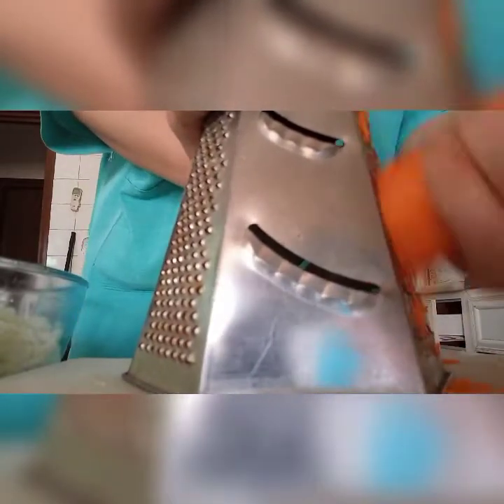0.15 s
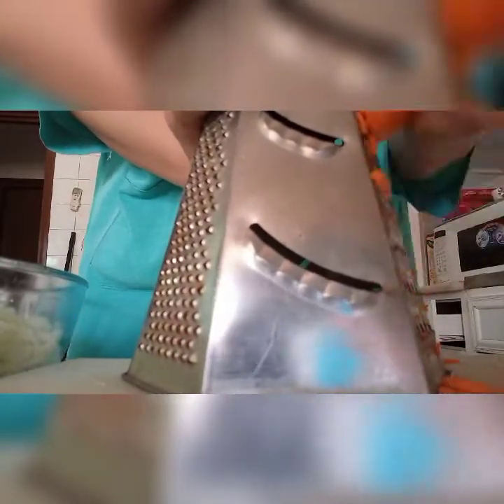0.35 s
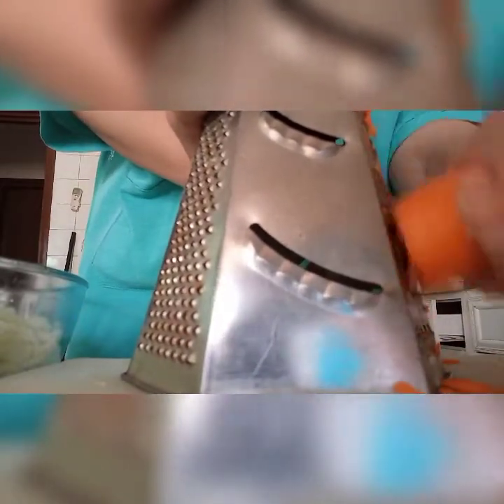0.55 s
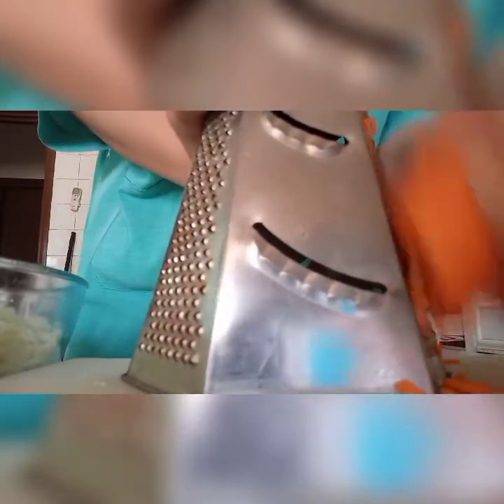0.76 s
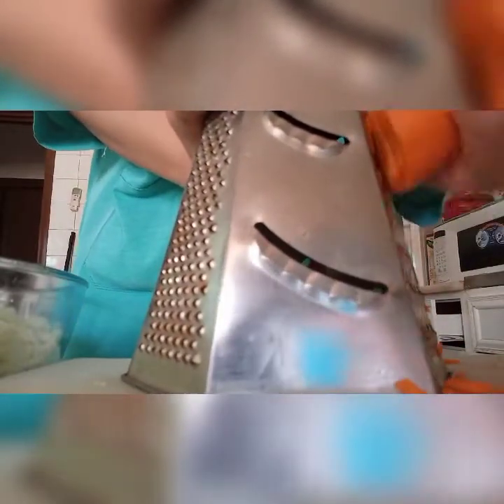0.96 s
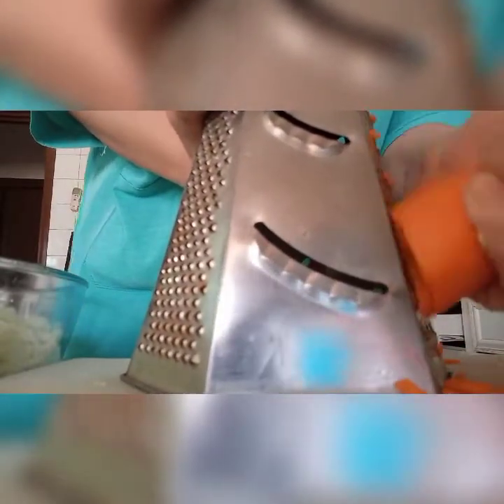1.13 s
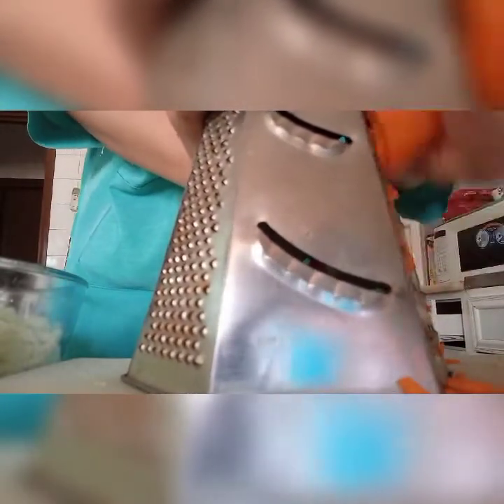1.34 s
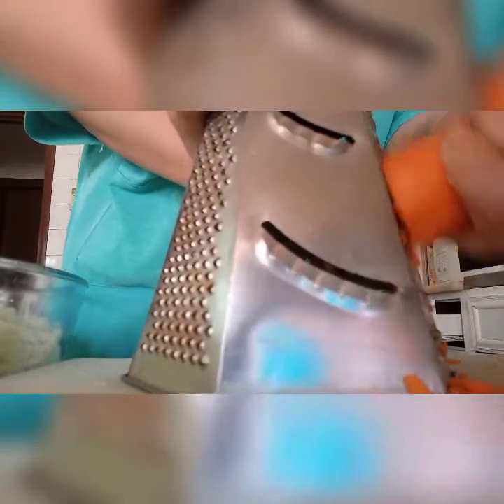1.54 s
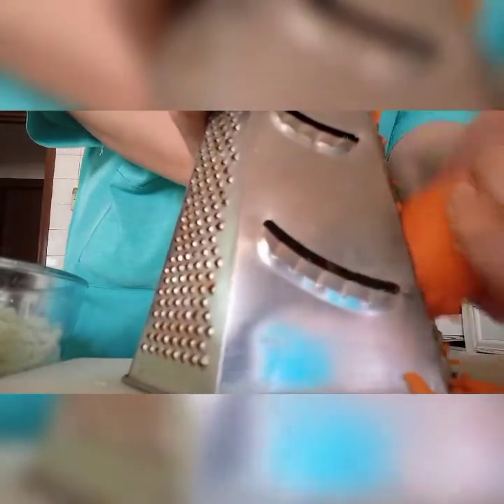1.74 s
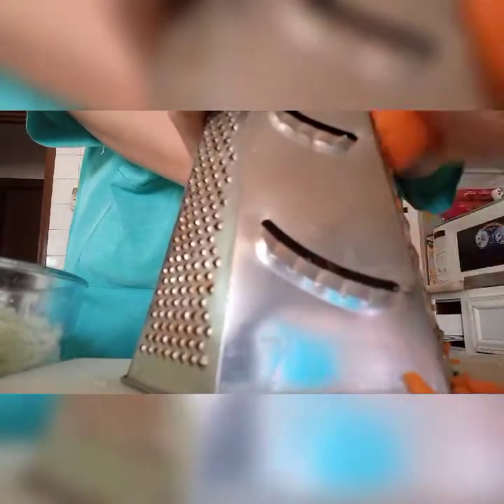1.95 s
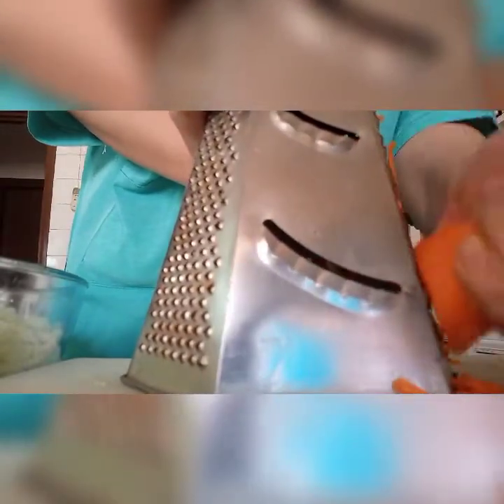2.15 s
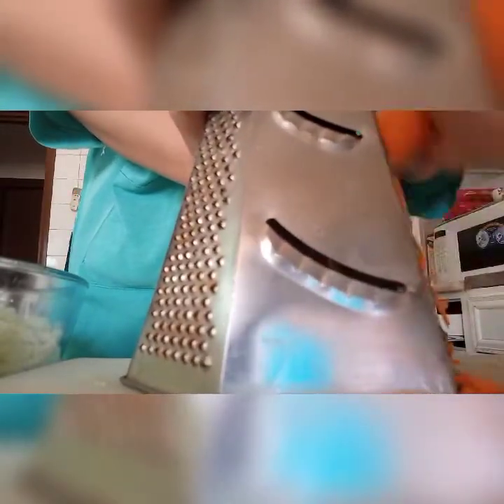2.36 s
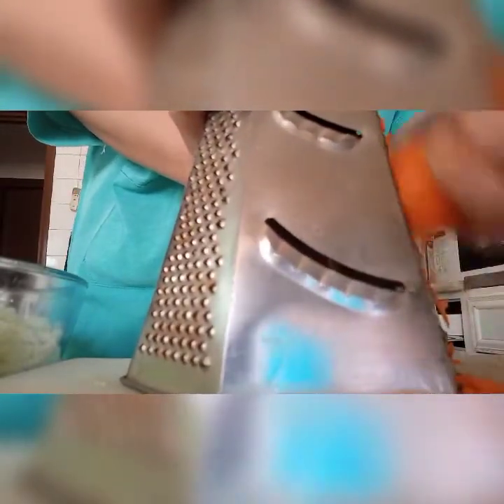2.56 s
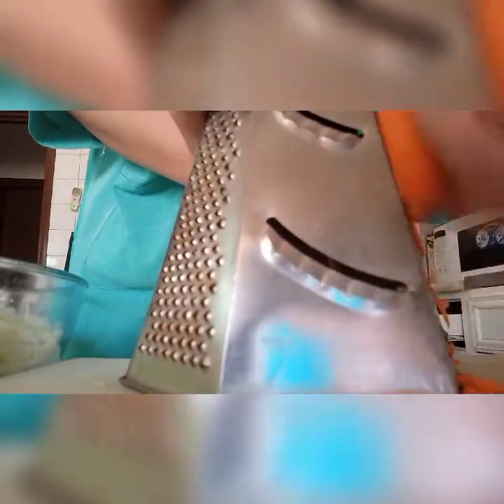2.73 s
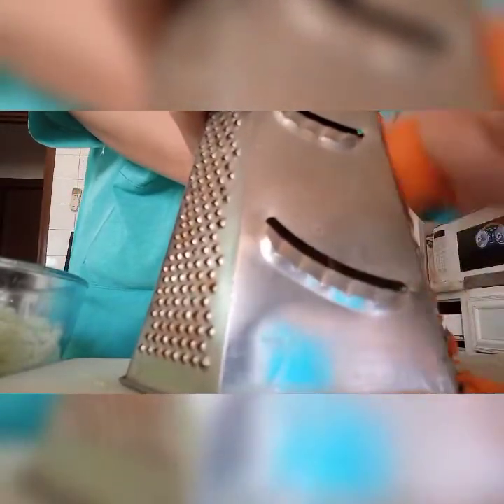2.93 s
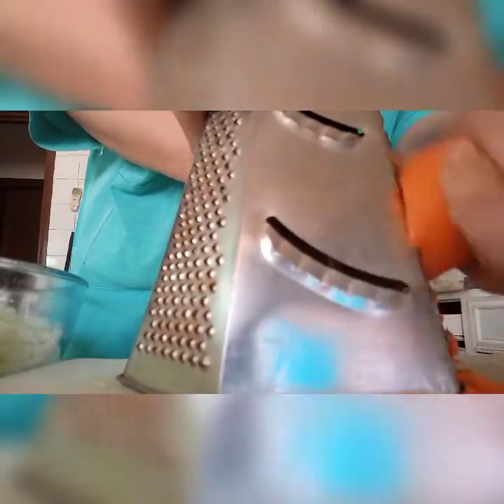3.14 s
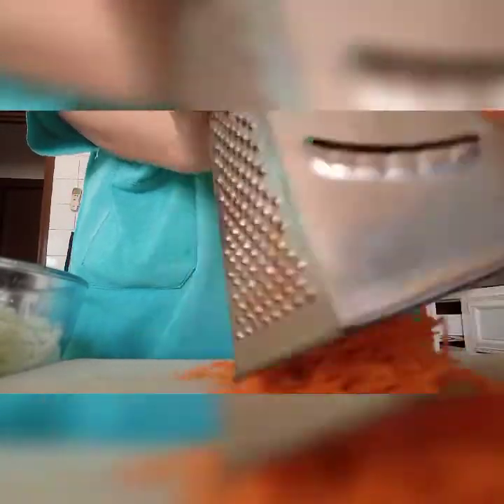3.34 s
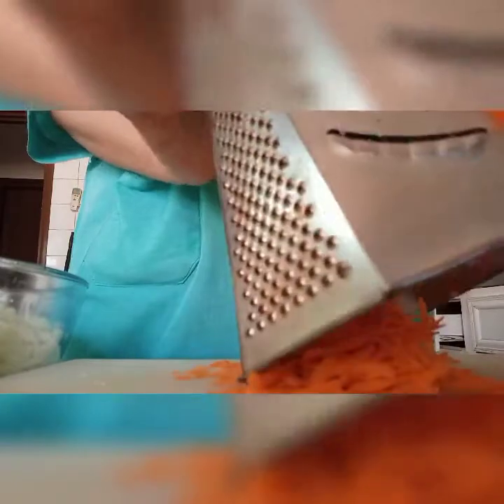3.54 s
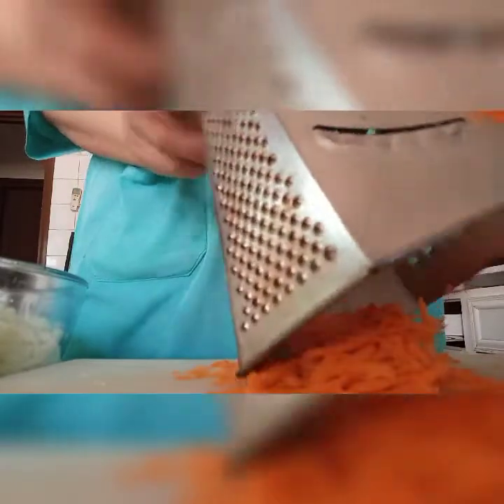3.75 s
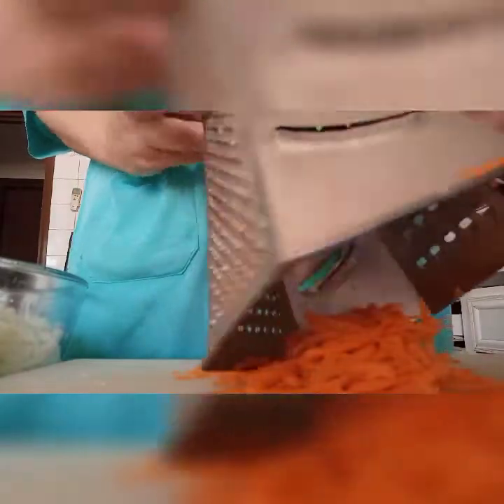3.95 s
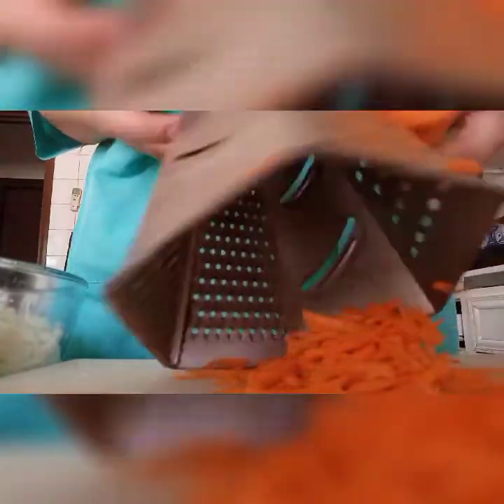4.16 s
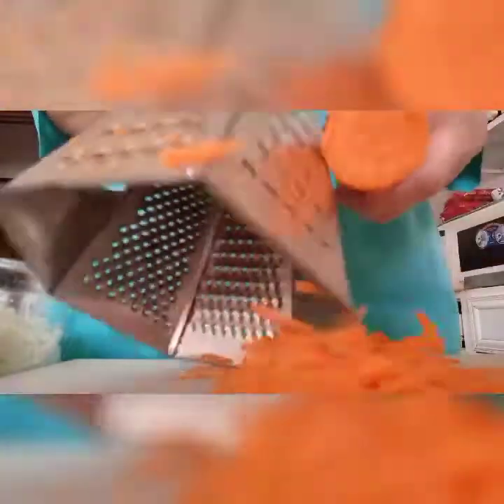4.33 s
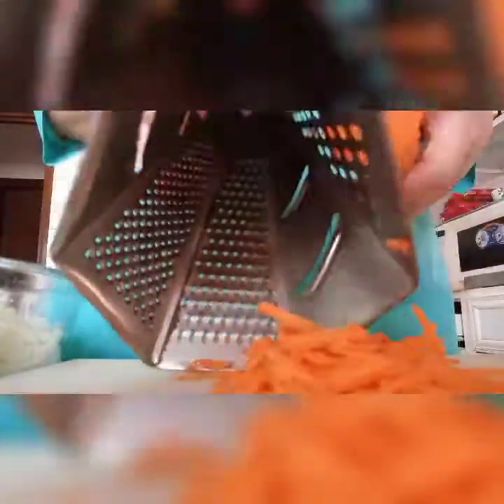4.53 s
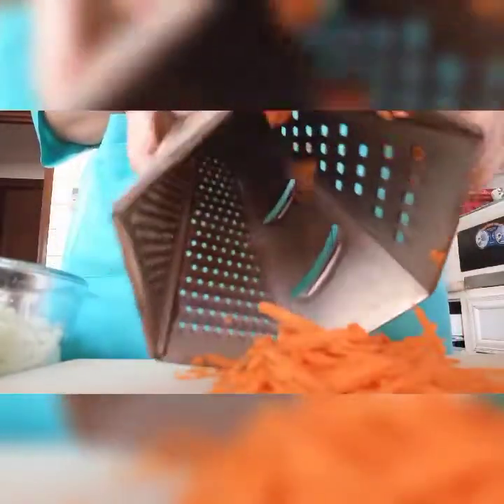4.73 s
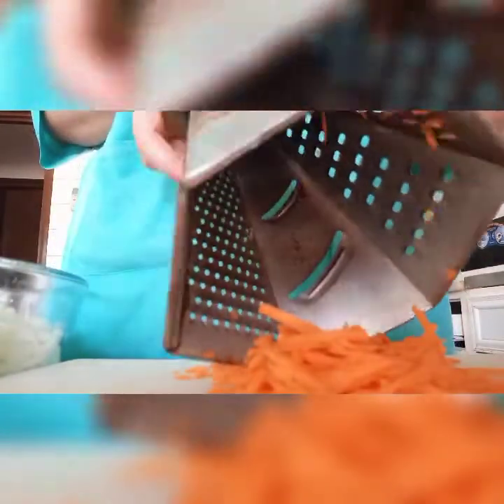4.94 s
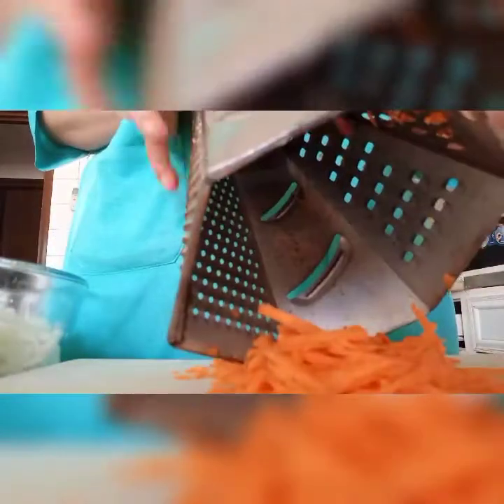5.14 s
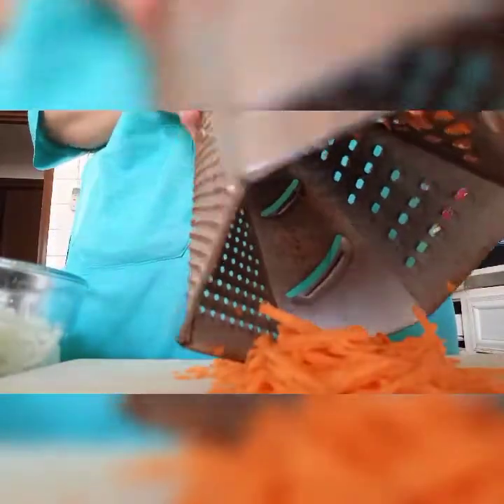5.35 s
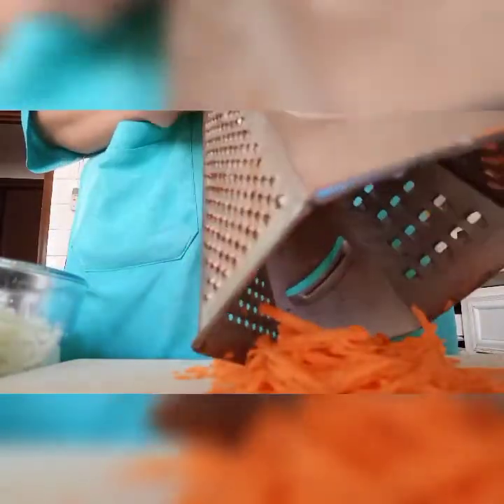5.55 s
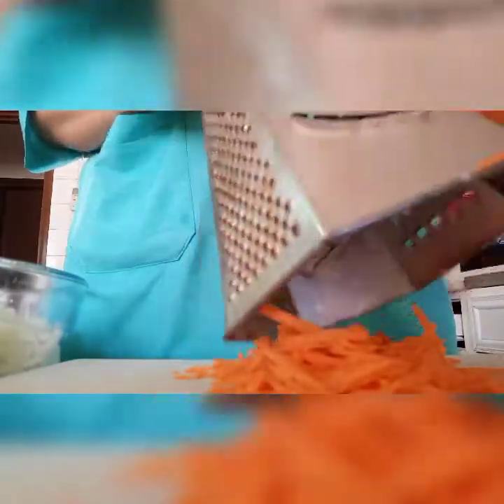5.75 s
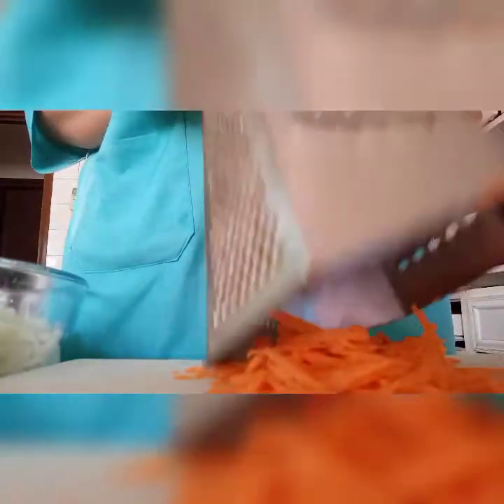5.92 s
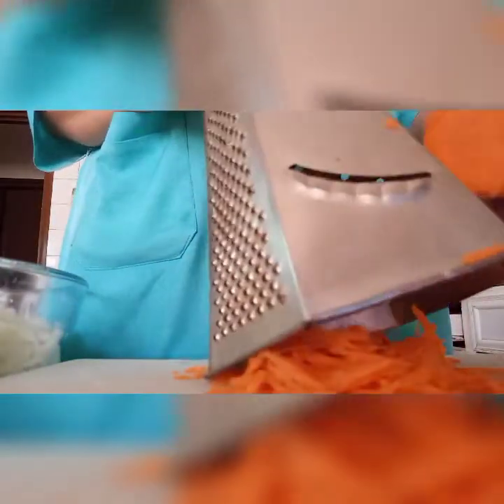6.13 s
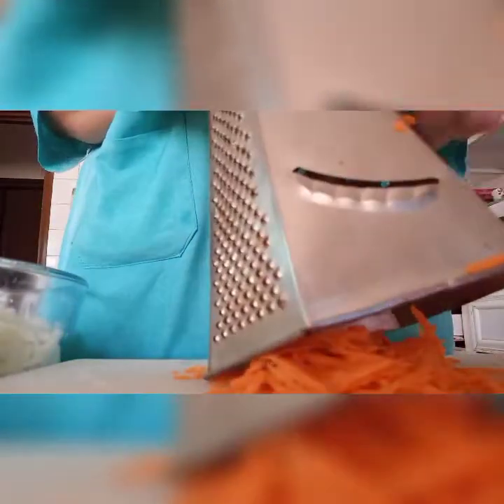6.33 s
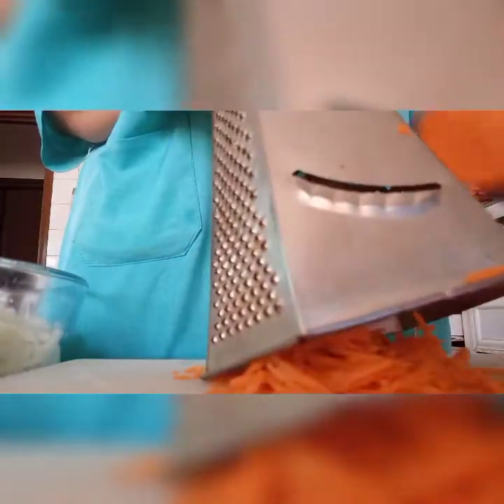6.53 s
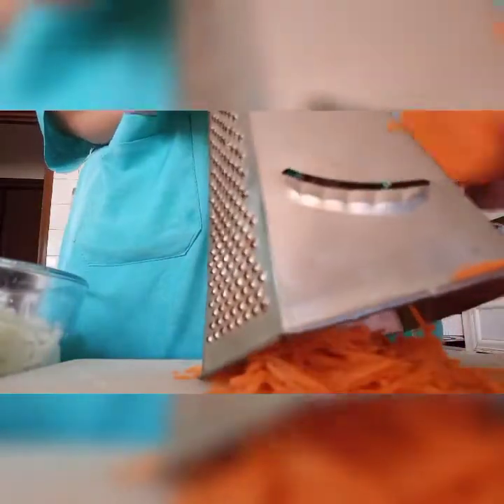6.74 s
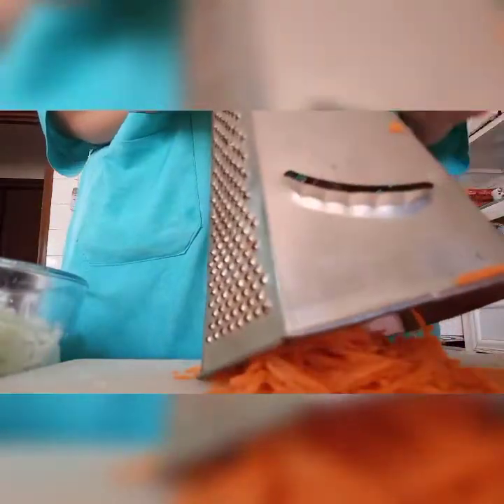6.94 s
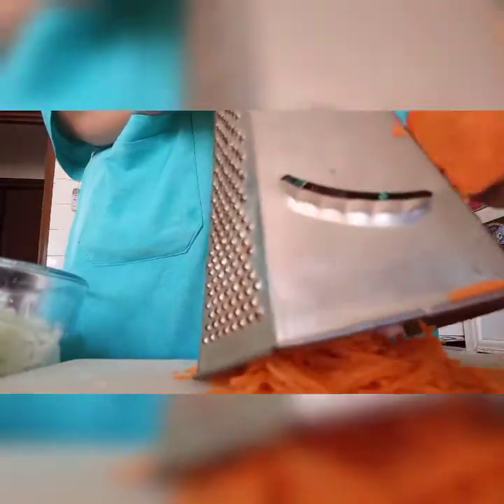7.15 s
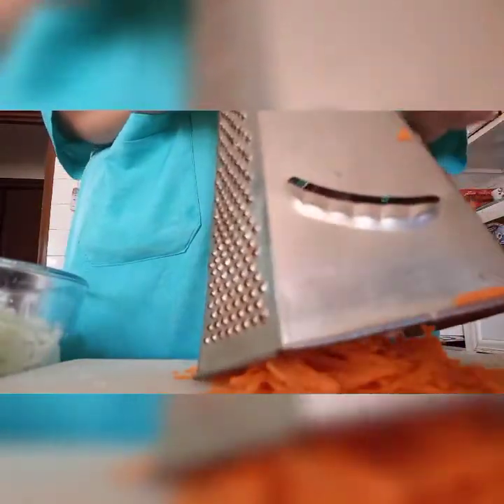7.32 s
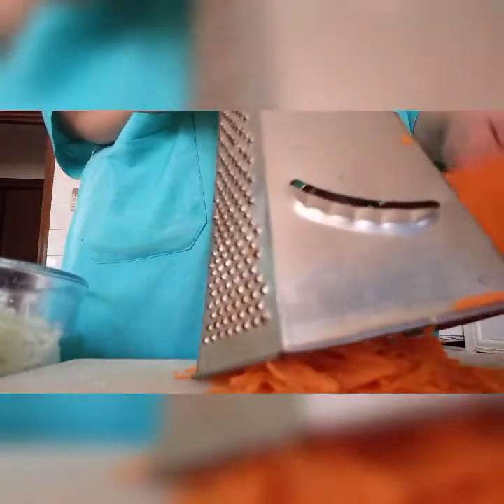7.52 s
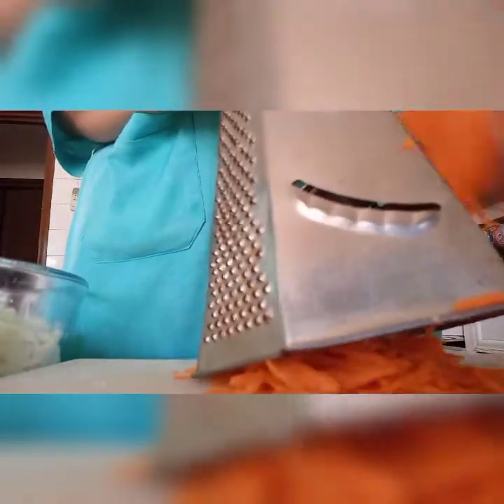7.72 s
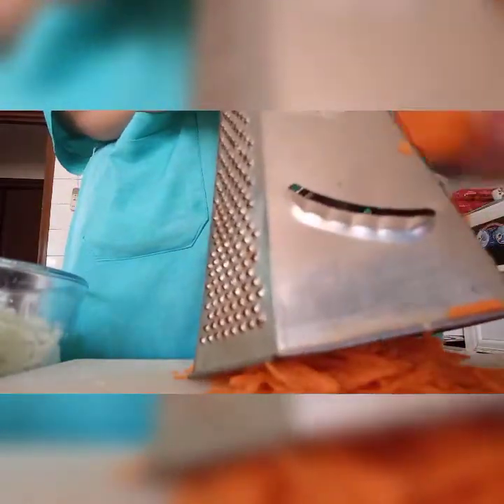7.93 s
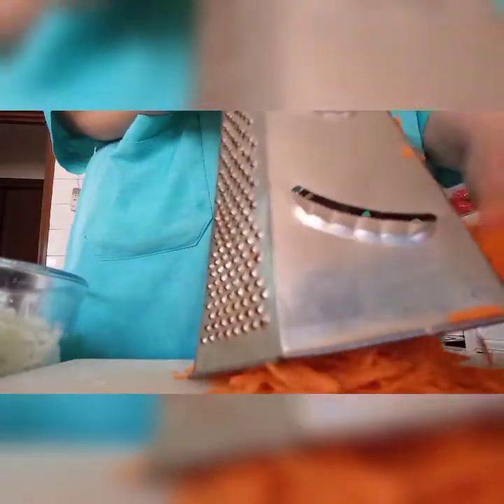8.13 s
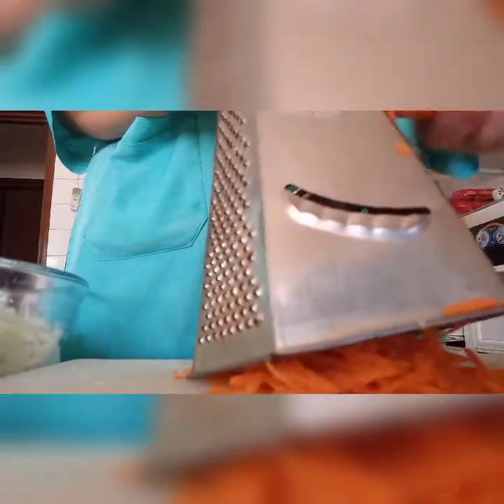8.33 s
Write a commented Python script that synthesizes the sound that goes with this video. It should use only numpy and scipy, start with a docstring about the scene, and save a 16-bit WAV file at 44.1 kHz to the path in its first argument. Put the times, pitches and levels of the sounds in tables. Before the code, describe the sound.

Quick back-and-forth grating of carrot on a ringing metal grater stops for some soft handling, then starts again in a quiet kitchen.

```python
"""In a quiet kitchen, a raw carrot is rasped up and down a sheet-metal box grater on a board.
Tearing fibres crackle, the grater walls ring briefly and the board hums low under each push.
In a pause the grater is tilted, handled and set down again, with small taps and scuffs.
Then the grating resumes. A short echo and faint room air lie behind it."""
import sys
import numpy as np
from scipy import signal
from scipy.fft import rfft, irfft
from scipy.io import wavfile
from scipy.ndimage import uniform_filter1d

SR = 44100
rng = np.random.default_rng(int(sys.argv[2]) if len(sys.argv) > 2 else 0)


def to_wav(sig):
    """Store sig (one row per channel, or 1-D mono) as 16-bit WAV at the path in sys.argv[1].

    Samples outside -1..1 are clipped; the rate is SR.
    """
    pcm = np.clip(np.atleast_2d(sig), -1, 1) * 32767
    pcm = np.round(pcm).astype(np.int16)
    wavfile.write(sys.argv[1], SR, pcm.T)  # frames by channels


N = 369558


def undb(db):
    """Level in dB to gain."""
    return np.exp(np.asarray(db) * (np.log(10) / 20))


def unit(x):
    """Scale to rms 1."""
    return x / np.sqrt(np.mean(x ** 2))


def walk(rate_hz):
    """Random values at rate_hz, joined by straight lines; rms 1."""
    knots = rng.standard_normal(int(N / SR * rate_hz) + 2)
    return unit(np.interp(np.arange(N) * rate_hz / SR, np.arange(len(knots)), knots))


def crackle(per_s, spread_db):
    """Snaps at random moments, a few much larger than the rest; rms 1."""
    chance, polarity, size = rng.random((3, N))
    return unit((chance < per_s / SR) * np.sign(polarity - .5) * undb(-spread_db * np.log(size + 1e-9)))


def colour(x, points, size=4096):
    """Minimum-phase filter through (frequency [Hz], gain [dB]) points."""
    hz, db = np.transpose(points)
    bins_hz = np.arange(size // 2 + 1) * SR / size
    cepstrum = irfft(np.interp(np.log(bins_hz + 1), np.log(hz), db) * np.log(10) / 20)
    cepstrum[1:size // 2] *= 2
    cepstrum[size // 2 + 1:] = 0
    return signal.fftconvolve(x, irfft(np.exp(rfft(cepstrum))))[:N]


def resonate(x, modes, wander_db=0., rate_hz=12):
    """Modes (frequency [Hz], width [Hz], gain [dB]); each one's drive varies as the contact wanders."""
    total = 0
    for k, (hz, width_hz, db) in enumerate(modes):
        drive = x * undb(db + wander_db * walk(rate_hz))
        total += (-1) ** k * signal.lfilter(*signal.iirpeak(hz, hz / max(width_hz, 5), fs=SR), drive)
    return total


def shelve(x, db):
    """Treble shelf above 7.3 kHz."""
    treble = signal.sosfiltfilt(signal.butter(4, 7300, "high", fs=SR, output="sos"), x)
    return x + treble * (undb(db) - 1)


def gestures(rows, rise_s, fall_db):
    """Rise, hold and fall of (time [s], hold [s], level [dB], swell [dB]) rows; the loudest leads."""
    hop, rise_power = 32, 2.04
    t = np.arange(0, N, hop) / SR
    start_s, hold_s, db, swell_db = np.transpose(rows)[:, :, None]
    progress = (t - start_s) / np.maximum(hold_s, .01)
    rise_db = 20 * rise_power * np.log10(np.clip(1 + (t - start_s) / rise_s, 1e-4, 1))
    late_s = np.maximum(t - start_s - hold_s, 0)
    level_db = db + swell_db * np.clip(progress, 0, 1) + rise_db + fall_db(late_s)
    frame = np.arange(N) // hop
    row = np.argmax(level_db, axis=0)[frame]
    return np.maximum(level_db[row, frame], -120), progress[row, frame], row


# room air spectrum: (frequency [Hz], gain [dB])
ROOM_SPECTRUM = [(18, -71.5), (30, -32.5), (79, -0.5), (130, -25), (221, -12.5), (252, -21), (295, -20.5),
                 (384, -24), (620, -22), (3310, -66), (5500, -65), (6800, -59.5), (7600, -71.5),
                 (16000, -67)]


def room(level_db=-63.5):
    """Quiet kitchen air that wavers slightly."""
    return unit(colour(rng.standard_normal(N), ROOM_SPECTRUM)) * undb(level_db + 1.6 * walk(12))


# jolts that flex the board: (centre time [s], length [s], pitch [Hz], level [dB])
BOARD_JOLTS = [(0.006, 0.041, 98, -29), (0.1, 0.062, 92, -30.5), (0.358, 0.074, 88.3, -34),
               (0.665, 0.032, 92.2, -34), (1.021, 0.045, 83.9, -33), (1.294, 0.037, 87.7, -37),
               (1.561, 0.046, 87.5, -32), (1.938, 0.049, 86, -41), (2.316, 0.02, 92.3, -33),
               (2.445, 0.03, 83.7, -31), (2.639, 0.029, 91.4, -26), (2.712, 0.046, 82.7, -37),
               (2.972, 0.076, 78.2, -32), (3.05, 0.039, 84.7, -42), (3.304, 0.018, 83.5, -47),
               (3.353, 0.089, 80.6, -33), (3.531, 0.041, 83.3, -51), (3.626, 0.052, 84.5, -50),
               (4.189, 0.066, 83.5, -42.0), (4.479, 0.041, 82.6, -40), (4.704, 0.043, 84.2, -51),
               (4.77, 0.032, 85.5, -53), (4.938, 0.036, 80.8, -55.0), (5.166, 0.056, 82.0, -38),
               (5.305, 0.046, 77, -56), (6.2, 0.062, 84, -35.5), (6.304, 0.074, 85.4, -41),
               (6.808, 0.045, 83.8, -35), (7.149, 0.054, 79.7, -28.5), (7.484, 0.064, 82.4, -37),
               (7.603, 0.075, 78.7, -28.5), (7.968, 0.05, 79, -35), (8.342, 0.055, 78, -32.5)]


def board(tear_db, hum_re_tear_db=-8.5):
    """One low, unsteady bending mode: jolts swell it and shake the box, cutting keeps it humming."""
    t = np.arange(N) / SR
    swell = np.zeros(N)
    for centre_s, length_s, _, db in BOARD_JOLTS:
        span = slice(max(int((centre_s - 2 * length_s) * SR), 0), int((centre_s + 2 * length_s) * SR))
        swell[span] += undb(db) * .5 ** (2 * (t[span] - centre_s) / length_s) ** 2
    times_s, _, hz, _ = np.transpose(BOARD_JOLTS)
    pitch_hz = np.interp(t, times_s, hz) * (1 + .0251 * walk(25))
    tone = np.sqrt(2) * np.sin(2 * np.pi * np.cumsum(pitch_hz) / SR)
    box = unit(resonate(rng.standard_normal(N), [(140, 31, -2.5), (293.7, 17, -1)]))
    bending = [(85, 17, 0)]
    hum = unit(resonate(resonate(rng.standard_normal(N), bending), bending))
    hum_gain = uniform_filter1d(undb(tear_db + hum_re_tear_db), int(.08 * SR))
    return swell * (tone + undb(-12) * box) + hum_gain * hum


# free sheet-metal modes: (frequency [Hz], level [dB], undamped t60 [s])
SHEET_MODES = [(605, 3, 0.25), (942, -2, 0.31), (1099, 2.5, 0.14), (1130, -5, 0.085), (1320, 7, 0.037),
               (1580, -2.5, 0.12), (1960, -7.5, 0.16), (2170, -5.5, 0.18), (2448, -21, 0.15),
               (2915, -4, 0.13), (2903, -7.5, 0.066), (3140, -6, 0.15), (3540, -9, 0.2),
               (4470, -3.5, 0.096), (5420, -0.5, 0.042), (5860, 0.5, .06), (6330, 8.5, 0.1),
               (6395, 4.5, 0.054)]


def sheet(centre_hz, octaves, t60_scale):
    """Ring of the sheet: the touched spot favours modes near one pitch, the holding hand damps them."""
    near = [mode for mode in SHEET_MODES if abs(np.log2(mode[0] / centre_hz)) < 2 * octaves]
    hz, db, t60_s = np.transpose(near)[:, :, None]
    t = np.arange(SR // 3) / SR
    favour = np.exp(-(np.log2(hz / centre_hz) / octaves) ** 2)
    partials = favour * undb(db) * np.sin(2 * np.pi * hz * t) * 1000 ** (-t / (t60_scale * t60_s))
    return unit(partials.sum(axis=0)) / np.sqrt(len(t))


# loaded walls and cavity: (frequency [Hz], width [Hz], gain flat [dB], gain tilted [dB])
WALL_MODES = [(223.4, 40, -5, -5.5), (239.2, 13, -3.5, -0.5), (298, 15.8, -1, 1.5), (329.5, 18, -4, 0),
              (381.6, 57, -7.5, -3.5), (464.6, 26.5, -2, 2), (528, 53, -4.5, -1.5), (639, 16, -5, 1),
              (725, 110, -4.5, -4), (860, 85, 1.5, -1), (963, 70, 1.5, 1), (1056, 103, 1.5, 0.5),
              (1159, 63, 1, 4.5), (1306, 180, -6.5, -1)]


def walls(low_push, high_push, tilt_s=4.5):
    """Low and high wall modes, driven apart; their balance changes once the grater stands tilted."""
    tilted = np.arange(N) > tilt_s * SR
    modes = [(hz, width_hz, np.where(tilted, tilted_db, flat_db))
             for hz, width_hz, flat_db, tilted_db in WALL_MODES]
    wander = dict(wander_db=2.8, rate_hz=16)
    return resonate(low_push, modes[:8], **wander) + resonate(high_push, modes[8:], **wander)


# resonances of the teeth: (frequency [Hz], width [Hz], gain [dB])
TEETH_MODES = [(1870, 110, -10), (2185, 82, 5), (2500, 160, -15.5), (2714, 110, 3), (3087, 65, 5.5),
               (3463, 52, 1), (4430, 23, -2.5), (3980, 210, 4), (5060, 100, -3), (5870, 120, -3),
               (6950, 450, -10.5), (7390, 150, -1.5), (8650, 170, -7), (9750, 150, 4.5)]
# airborne rasp spectrum: (frequency [Hz], gain [dB])
RASP_SPECTRUM = [(760, -30.5), (1300, -7.5), (1670, -8.5), (2770, -6.5), (3110, -11), (3380, -8.5),
                 (3920, -5.5), (4780, -12), (6760, -6.5), (7590, -19.5), (12000, -12.5), (15200, -17.5),
                 (16000, -8.5)]


def rasp(snaps, level_db, teeth_db, sheen, knee_db):
    """Snaps heard through the air, partly ringing the teeth; harder cutting is brighter."""
    teeth = resonate(snaps * undb(teeth_db), TEETH_MODES, wander_db=3, rate_hz=35)
    airborne = unit(colour(snaps + teeth, RASP_SPECTRUM)) * undb(level_db)
    return shelve(airborne, sheen * (level_db - knee_db) + .9 * walk(40))


# slides in the pause: (time [s], hold [s], level [dB], swell [dB], panel ring trim [dB])
FINGER_SCUFFS = [(3.404, 0.22, -61, -3.5, 2), (3.82, 0.054, -76, 9.5, 4), (3.95, 0.27, -68, -0.5, 3.5),
                 (4.353, 0.081, -63, 8, -1), (4.55, 0.033, -58, -2.5, -8.5), (4.68, 0.15, -63.5, -12, -1.5),
                 (5.16, .08, -62.5, -3, -5), (5.279, 0.084, -73.5, -5, 4), (5.521, 0.053, -55, -2.5, -5.5),
                 (5.657, 0.053, -64, -8, -2), (6.046, .11, -56, -10, 1)]


def handling(touch_s=.064, leave_db_per_s=150, resting_db=-86.5):
    """Fingers and shreds slide on the metal, stirring the panels and making the sheet shimmer."""
    table = np.array(FINGER_SCUFFS)
    scuff_db, _, row = gestures(table[:, :4], touch_s, lambda late_s: -leave_db_per_s * late_s)
    scuff_db = np.maximum(scuff_db, resting_db)
    ring_db = uniform_filter1d(table[row, 4], SR // 20)
    grip = undb(2 * walk(30))
    push = grip * crackle(per_s=3000, spread_db=.9) * undb(scuff_db)
    shimmer = undb(-4) * signal.fftconvolve(push, sheet(2600, octaves=1.1, t60_scale=.6))[:N]
    panels = walls(undb(26 + ring_db) * push, undb(17.5 + ring_db) * push)
    snaps = grip * crackle(per_s=7600, spread_db=1.8)
    return rasp(snaps, scuff_db, teeth_db=-2.5, sheen=.12, knee_db=-29) + shimmer + panels


# taps on the grater and snags of the carrot:
# (time [s], drive [dB], burst t60 [s], favoured ring [Hz], ring trim [dB], ring t60 scale [ratio])
TAPS_AND_SNAGS = [(0.13, -41, .04, 1100, 10.5, .2), (0.448, -36, .03, 1100, 8.5, 0.3),
                  (0.482, -36.5, 0.029, 3000, 8, 0.2), (0.599, -36, .04, 1000, 3.5, 0.3),
                  (0.7405, -22, 0.018, 1080, 4.5, 0.35), (0.7867, -28, 0.047, 1140, -5, 0.8),
                  (0.9514, -33.5, 0.023, 1058, 14.5, 0.05), (1.221, -34, .04, 1000, 0, .2),
                  (1.362, -41, 0.033, 1005, 4.5, 0), (1.385, -40, .03, 3000, 0, .3),
                  (2.024, -27.5, 0.081, 1180, 2, 0.53), (2.229, -31, .04, 1000, 5.5, 0.35),
                  (2.2832, -24.5, 0.037, 1030, 8.5, 0.95), (2.4579, -25.5, 0.022, 2600, 3.5, .12),
                  (2.542, -43.5, .05, 1100, -0.5, 0.3), (2.781, -31.5, .03, 3000, 0, 0.5),
                  (2.832, -33.5, .04, 3000, -3.5, 0.14), (2.895, -35, .04, 1000, 7.5, .2),
                  (2.9199, -28.5, 0.058, 916, 10, 0.26), (3.062, -37, .08, 2100, -0.5, .2),
                  (3.383, -41, 0.068, 881, 5.5, 0.06), (3.422, -53, 0.013, 6400, 24, 0.07),
                  (3.5734, -48.5, 0.13, 993, 8, 0.15), (3.624, -45.5, 0.064, 1070, 4, 0.4),
                  (3.666, -55.5, 0.19, 830, 6.5, 0), (3.782, -60.5, 0.13, 1080, 4.5, 0.4),
                  (3.8558, -47.5, 0.19, 2770, -21, 0.7), (3.963, -46, 0.049, 930, 11.5, 0.22),
                  (4.0497, -51.5, 0.14, 2020, 2, 0.45), (4.116, -56, 0.18, 2800, -18, 0.63),
                  (4.38, -46, 0.13, 990, 2, 0.8), (4.4281, -40.5, 0.07, 993, 1, 0.07),
                  (4.5335, -45.5, 0.096, 2810, -22, 0.6), (4.63, -60, .06, 1360, 1, 0.7),
                  (4.633, -51, 0.055, 2780, -3, 0.3), (4.6767, -33.5, 0.097, 2610, -4, 0.06),
                  (4.8085, -62, 0.14, 1220, -2, .3), (4.87, -64.5, 0.097, 2366, -11, 0.9),
                  (5.1223, -49.5, 0.13, 965, 4.5, 0.6), (5.2732, -41, 0.17, 1310, 1.5, 1),
                  (5.7056, -52.5, 0.071, 1600, 5.5, 1.1), (5.8646, -72.5, .08, 6500, -0.5, 0.3),
                  (5.9282, -72, .08, 6500, -1.5, .5), (6.0032, -53, 0.37, 910, 3.5, 0.6),
                  (6.0447, -42, 0.14, 705, 1, 0.9), (6.109, -40, 0.19, 930, 3, 0.83),
                  (6.166, -25.5, 0.042, 486, -4, 0), (6.686, -33.5, 0.044, 1200, 6.5, 0.3),
                  (6.448, -34, .03, 600, 5, 0.1), (7.385, -47, .03, 3000, -4, .3),
                  (7.728, -31, .04, 1090, -3, 0.1), (7.7611, -27, .04, 1100, -3, 0.66)]


def taps():
    """Each tap is a burst that rattles out, rings the sheet near the touched spot and knocks the walls."""
    rattle, rings, blows = np.zeros((3, N))
    t = np.arange(SR // 3) / SR
    for time_s, drive_db, t60_s, hz, ring_db, t60_scale in TAPS_AND_SNAGS:
        start = int(time_s * SR)
        span = slice(start, start + len(t))
        decay = 1000 ** (-t / max(t60_s, .01)) + .14 * np.exp(-t / .014)
        burst = undb(drive_db) * rng.standard_normal(len(t)) * decay
        ring = sheet(hz, octaves=.75, t60_scale=max(t60_scale, .05))
        rattle[span] += burst
        rings[span] += undb(ring_db) * signal.fftconvolve(burst, ring)[:len(t)]
        blows[span] += burst * (1000 / hz) ** 2  # soft, low contacts shove the whole box
    knock = resonate(blows, [(150, 25, -4), (292, 25, 1.5), (500, 95, -16)])
    dull_rattle = shelve(colour(rattle, RASP_SPECTRUM), -5.5)
    return undb(10) * (dull_rattle + knock) + undb(-1) * rings


# carrot strokes: (full bite time [s], cut length [s], direction [1 down, -1 up], tearing level [dB],
# swell [dB], low wall trim [dB], high wall trim [dB])
CARROT_STROKES = [(0.015, 0.067, 1, -27, -1, 1, -6), (0.133, 0.088, -1, -43.5, 12.5, -2.5, -5.5),
                  (0.312, 0.083, 1, -29, 3, 1, -1.5), (0.458, 0.076, -1, -37.5, 5.5, -1, -4),
                  (0.615, 0.074, 1, -28.5, 2, 0, -1), (0.789, 0.082, -1, -36.5, -5, -0.5, -3),
                  (0.946, 0.069, 1, -29, -0.5, -2.5, -4), (1.072, 0.079, -1, -38, 2.5, -2, -4),
                  (1.23, 0.073, 1, -35, 6, -1, -3.5), (1.375, 0.081, -1, -40.5, 11.5, -2.5, -5),
                  (1.539, 0.087, 1, -30, 1, 1.5, -5), (1.738, 0.079, -1, -37.5, 3, -4.5, -4),
                  (1.895, 0.079, 1, -28, 1.5, -1, -5), (2.082, 0.073, -1, -35, 3.5, -3, -2),
                  (2.24, 0.093, 1, -29.5, 3, -1, -4.5), (2.407, 0.086, -1, -33.5, 0, -2, -3.5),
                  (2.568, 0.11, 1, -28, 0, -1.5, -5), (2.763, 0.074, -1, -32, -3, -3.5, -5.5),
                  (2.908, 0.094, 1, -31, 6, -1, -1), (3.084, 0.091, -1, -31, -3.5, -2.5, -1.5),
                  (3.252, 0.076, 1, -28.5, -5, 1, -5.5), (6.166, 0.13, 1, -46, 19, -4.5, -5.5),
                  (6.396, 0.074, -1, -40.5, 5, -3, -4), (6.548, 0.095, 1, -34, 6, -4.5, -7.5),
                  (6.752, 0.066, -1, -38.5, 5, -4.5, -4.5), (6.889, 0.072, 1, -32, 6.5, -4, -7),
                  (7.028, 0.11, -1, -49, 16, -3.5, -4.5), (7.215, 0.072, 1, -33.5, 9.5, -6, -6.5),
                  (7.378, 0.093, -1, -46.5, 14.5, -7.5, -5.5), (7.572, 0.093, 1, -28.5, 2.5, -4, -5),
                  (7.735, 0.096, -1, -39.5, 0.5, -3, 0), (7.906, 0.088, 1, -28.5, 0, -3, -2.5),
                  (8.074, 0.1, -1, -35.5, -1.5, -5, -2), (8.235, 0.099, 1, -26, -3, -4.5, -4.5)]


def strokes(drag_db=-14, drag_db_per_s=150):
    """The carrot bites, cuts, lifts and drags on lightly; the wall ring drifts as it crosses the face."""
    table = np.array(CARROT_STROKES)
    goes_down = table[:, 2:3] > 0
    bite_s = np.where(goes_down, .047, .035)
    lift_db_per_s = np.where(goes_down, 748, 447)
    fall_db = lambda late_s: np.maximum(-lift_db_per_s * late_s, drag_db - drag_db_per_s * late_s)
    tear_db, progress, row = gestures(table[:, [0, 1, 3, 4]], bite_s, fall_db)
    down = goes_down[row, 0]
    place = np.clip(progress, -.4, 1.4) - .5
    low_drift_db, high_drift_db = np.where(down, -3.5, 1), np.where(down, -1.5, 1)
    low_db = uniform_filter1d(table[row, 5] + place * low_drift_db, SR // 100)
    high_db = uniform_filter1d(table[row, 6] + place * high_drift_db, SR // 100)
    return tear_db, low_db, high_db, down


# air in the box, pumped by downward cuts: (frequency [Hz], width [Hz], gain [dB])
CAVITY_MODES = [(284, 18, -5), (270, 38, -7)]


def carrot(tear_db, low_db, high_db, down):
    """Fibres tear on the teeth as the grip slips and catches, shaking walls, cavity and board."""
    grip = undb(.89 * walk(28) + 1.02 * walk(60) + 1.7 * walk(150))
    push = grip * crackle(per_s=1500, spread_db=2.03) * undb(tear_db)
    wall_ring = walls(push * undb(21.5 + low_db), push * undb(19 + high_db))
    cavity = resonate(down * push * undb(25 + low_db), CAVITY_MODES, wander_db=4, rate_hz=16)
    board_modes = [(42, 10, -16.5), (69, 15, -6.5), (107, 30, -6.5), (136, 23, -4.5)]
    rumble = resonate(push * undb(22 + low_db), board_modes)
    snaps = grip * crackle(per_s=14000, spread_db=1.8)
    tearing = rasp(snaps, tear_db, teeth_db=np.where(down, 0, 2.5), sheen=.068, knee_db=-34.5)
    return tearing + wall_ring + cavity + rumble


def kitchen_echo(x, t60_s=.24, delay_s=.006):
    """Short, dull reflections off the kitchen walls."""
    t = np.arange(SR // 2) / SR
    tail = shelve(rng.standard_normal(len(t)), -5.5) * 1000 ** (-t / t60_s) * (t > delay_s)
    return signal.fftconvolve(x, tail / np.sqrt(np.sum(tail ** 2)))[:N]


def scene():
    """Grater and its echo over board hum and room air; mono."""
    tear_db, low_db, high_db, down = strokes()
    grater = carrot(tear_db, low_db, high_db, down) + handling() + taps()
    return (grater + undb(-15) * kitchen_echo(grater) + board(tear_db) + room())[None]


def record(dry):
    """Steep low-pass at 15.75 kHz."""
    return signal.sosfilt(signal.ellip(10, .2, 75, 15750, fs=SR, output="sos"), dry)


dry = scene()
out = record(dry)
to_wav(out)
```